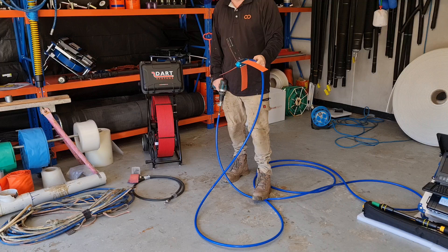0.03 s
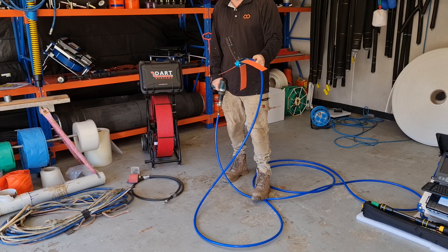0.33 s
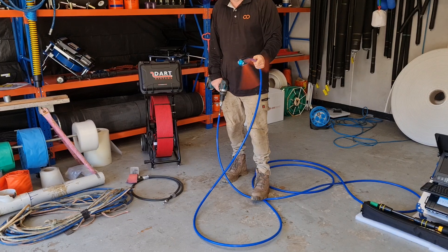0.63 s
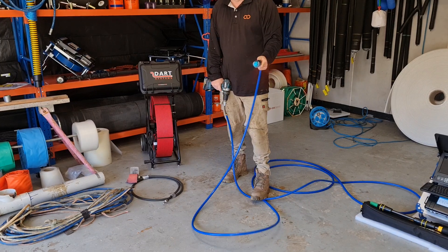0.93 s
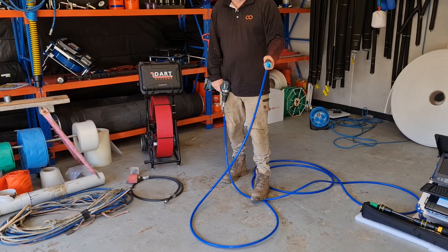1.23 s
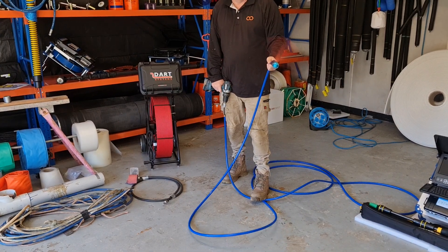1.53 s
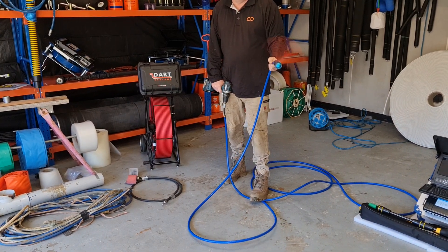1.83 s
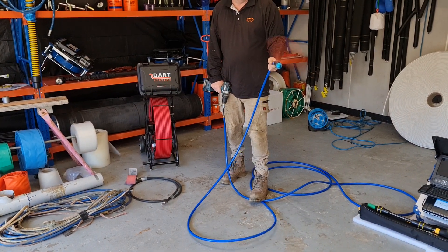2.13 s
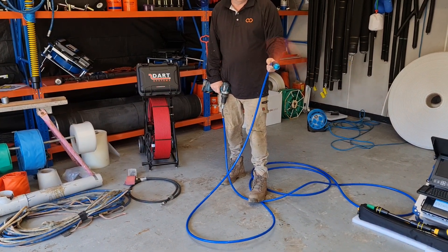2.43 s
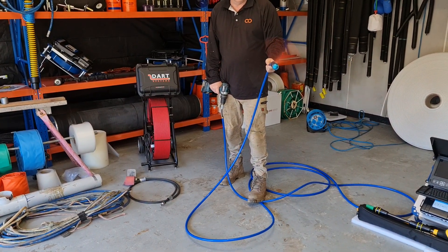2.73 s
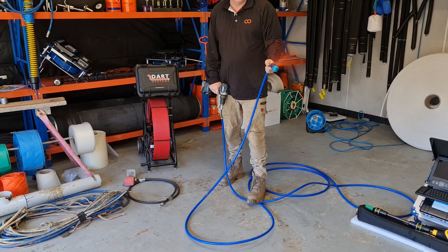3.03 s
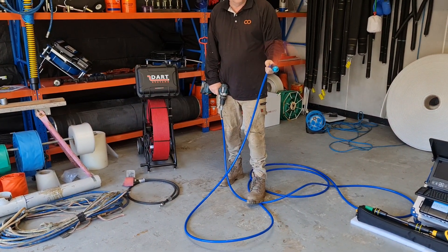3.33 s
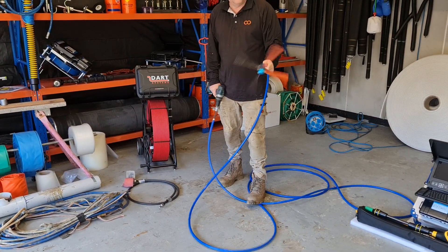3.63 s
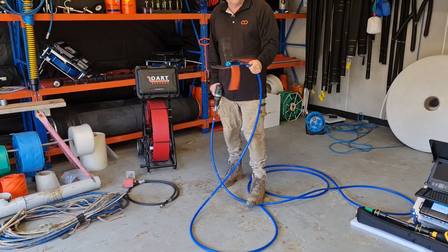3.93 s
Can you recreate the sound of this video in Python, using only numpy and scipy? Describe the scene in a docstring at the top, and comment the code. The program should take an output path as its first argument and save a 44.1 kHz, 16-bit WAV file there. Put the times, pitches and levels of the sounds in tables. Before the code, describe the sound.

A cordless drill creeps with a faint, thin whine from about 0.4 seconds. Near 0.8 it clacks and races up, wavers briefly, then whirs evenly from 1.3 while a flexible shaft rubs and rattles inside its hose. At 3.6 it stops with a sharp, ringing metallic squeak, followed by a light knock. The drill briefly starts again at 3.9. The workshop adds a short echo.

```python
"""In a workshop, a cordless drill turns a long flexible shaft inside its hose.
It first creeps, with the thin whine of its chopped current, then races up and hunts for its speed.
It settles into an even run: motor and gears sound multiples of the rotation rate, and the cable
rattles in the hose. The brake stops it with a sharp friction squeak that sets the chuck ringing.
The tip knocks once, and the trigger is squeezed again."""
import sys
import numpy as np
from scipy import signal
from scipy.fft import rfft, irfft
from scipy.io import wavfile

SR = 44100
rng = np.random.default_rng(int(sys.argv[2]) if len(sys.argv) > 2 else 0)


def unload_wav(signal):
    """Save mono or channel-first audio to the path in sys.argv[1] as 16-bit WAV at rate SR, clipped to [-1, 1]."""
    wavfile.write(
        sys.argv[1],
        SR,
        np.round(np.clip(np.atleast_2d(signal).T, -1, 1) * 32767).astype(np.int16),
    )


N = 176400
WHINE_ROOM_DB = 3   # reverberant over direct sound, for motor, gears and speed control


def drill(speed, shaft_angle):
    """Rotational orders: motor and gears radiate tones at fixed multiples of one fluttering speed."""
    # tones of the motor and of the gears: multiple of the motor speed, relative level/dB
    motor_orders = [(7, -14), (7.745, -21), (8, 7), (8.325, -21), (8.5, -24), (8.75, -14), (9, -22),
                    (16, -17)]
    gear_orders = [(.555, -23.5), (1.817, -14), (2.503, -19), (3, -6.5), (4.245, -13.5), (4.5, -24),
                   (5, -18), (6, 1.5), (6.75, -10), (9.5, -22), (12, -10), (14, -12), (16.5, -18),
                   (17.26, -18), (21, -22)]
    # envelopes of the motor whine and of the gears: t/s, level/dB
    motor_levels = [(.36, -100), (.39, -63), (.72, -76), (.79, -25), (.83, -26.5), (1.0, -29),
                    (1.05, -29.5), (1.1, -23), (1.14, -34.5), (1.22, -29.5), (1.29, -26.5), (1.36, -29.5),
                    (1.49, -28.5), (1.62, -30.5), (1.82, -24), (1.93, -19), (2.0, -27.5), (2.3, -25),
                    (2.39, -28.5), (2.53, -22), (2.63, -30.5), (2.8, -32.5), (2.9, -22.5), (3.0, -30.5),
                    (3.18, -34), (3.36, -26), (3.52, -28.5), (3.58, -39), (3.65, -85)]
    gear_levels = [(.36, -100), (.39, -66), (.72, -69), (.83, -31.5), (1.15, -35), (1.3, -30.5), (1.4, -32),
                   (1.6, -35), (2.05, -34), (2.3, -35.5), (2.45, -32.5), (2.75, -31.5), (2.88, -38),
                   (3.05, -31.5), (3.3, -31.5), (3.52, -28.5), (3.56, -40), (3.65, -85)]
    settled_s, settling_s, stutter_db = 1.34, 0.1127, 2
    hunting = np.clip((settled_s - seconds()) / settling_s, 0, 1)
    flutter = 0.00079 * wobble(hz=11)
    judder = 0.02202 * hunting * wobble(hz=112.4)   # lasts until the shaft settles
    turn_ripple = .0004 * np.sin(shaft_angle)
    motor_angle = 2 * np.pi * np.cumsum(speed * (1 + flutter + judder + turn_ripple)) / SR
    out = 0
    for orders, levels in ((motor_orders, motor_levels), (gear_orders, gear_levels)):
        tones = 0
        for order, db in orders:
            gain = from_db(db + stutter_db * wobble(hz=20.6))   # tones come and go as the shaft whips
            tones += gain * np.sin(order * motor_angle + rng.uniform(0, 2 * np.pi))
        out += workshop(rms_one(tones) * from_db(in_time(levels)[0]), WHINE_ROOM_DB)
    return out


def cable(speed, shaft_angle, loops=5):
    """Friction noise: the cable rubs and ticks in each loop of hose, most at one point of the turn."""
    # envelope of the rubbing: t/s, level/dB
    rub_levels = [(.35, -100), (.385, -46.5), (.55, -45), (.70, -40.5), (.76, -35.5), (.805, -31.5),
                  (.95, -29), (1.2, -31), (1.3, -29), (2.0, -29.5), (2.8, -29.5), (3.52, -29.5),
                  (3.59, -30.5), (3.65, -36), (3.72, -42), (3.80, -69), (3.888, -62), (3.898, -44),
                  (3.94, -32.5), (4, -57)]
    # spectrum of the rubbing: f/Hz, relative spectral level/dB
    rub_spectrum = [(60, -29), (130, -21), (240, -15.5), (480, -7), (780, 1), (1050, -3), (1500, 3.5),
                    (2000, -1.5), (2800, -2), (3500, 3.5), (3950, -4.5), (5000, -6), (7000, -8.5),
                    (7800, -19.5), (11000, -21), (16000, -23.5)]
    ticks_per_s, tick_spread_db, turn_depth, treble_hz = 900, 4.5, 0.63, 7200
    level = from_db(in_time(rub_levels)[0])
    treble = .25 + .75 * speed / speed.max()   # faster sliding is brighter
    out = 0
    for _ in range(loops):
        sizes = from_db(tick_spread_db * np.minimum(rng.exponential(1, N), 5))
        signs = rng.choice([-1, 1], N)
        ticks = rms_one(sizes * signs * (rng.random(N) < ticks_per_s / SR))
        friction = rng.standard_normal(N) / 2 + 0.66 * ticks
        contact = 1 + turn_depth * np.sin(shaft_angle + rng.uniform(0, 2 * np.pi))
        rub = coloured(friction * contact, rub_spectrum)
        dull, hiss = passband(rub, treble_hz), passband(rub, treble_hz, "high")
        rub = dull - treble * hiss   # the two bands are in antiphase, so the minus joins them
        out += workshop(level * rub, room_db=7.5, lag_s=.00038)
    return out / np.sqrt(loops)


def squeaks():
    """Stick-slip friction: metal squeaks at a rough, sagging pitch; the modes of the chuck ring on."""
    # squeaks as the drive catches and locks: t/s, duration/s, f/Hz, level/dB
    slips = [(0.709, .03, 1387, -34.5), (3.599, 0.015, 1515, -14.5)]
    # modes of the chuck: f/Hz, level relative to the squeak/dB, T60/s
    chuck_modes = [(1310, -7.5, .13), (1405, -2, 0.097), (1655, -9, .2), (1725, -7.5, 0.13),
                   (1916, -17, 0.42), (3060, -10.5, 0.19), (3260, -14, 0.15), (4650, -22, 0.17)]
    attack_s, release_s, sag_hz_per_s, jitter_hz = 0.0021, 0.0019, 3000, 45.7
    out = 0
    for start_s, length_s, pitch_hz, level_db in slips:
        age = np.maximum(seconds() - start_s, 0)
        pitch = pitch_hz - sag_hz_per_s * np.minimum(age, length_s) + jitter_hz * wobble(hz=137)
        release = np.exp(-np.maximum(age - length_s, 0) / release_s)
        slip = np.sqrt(2) * release * np.sin(2 * np.pi * np.cumsum(pitch) / SR)
        ring = sum(from_db(db - 60 * age / t60) * np.sin(2 * np.pi * (hz * age + rng.random()))
                   for hz, db, t60 in chuck_modes)
        out += from_db(level_db) * np.minimum(age / attack_s, 1) * (slip + ring)
    return workshop(out, room_db=2.5)


def knocks():
    """Impact noise: slack in the drive, taken up or let go, gives short, exponentially damped bursts."""
    # impacts: t/s, level before band-limiting/dB, attack/s, decay/s, lowest f/Hz, highest f/Hz
    impacts = [(.378, -38, 0.018, 0.017, 400, 9000), (.480, -36, 0.0072, .018, 4500, 10000),
               (0.729, -20, .004, 0.029, 704, 1720), (.731, -40, .004, 0.018, 3000, 12000),
               (.796, -22.5, 0.011, 0.016, 3000, 12600), (3.603, -19.5, .007, 0.019, 1900, 11000),
               (3.726, -35.5, .003, 0.025, 100, 13000), (3.893, -29.5, .004, 0.089, 1300, 1900),
               (3.93, -30, 0.026, 0.04, 2480, 13000)]
    # spectrum common to the impacts: f/Hz, relative spectral level/dB
    impact_spectrum = [(60, 1), (300, -33.5), (1000, 10), (3200, 8), (6500, -0.5), (8500, -4.5),
                       (16000, -5)]
    noise = coloured(rng.standard_normal(N), impact_spectrum)
    out = 0
    for start_s, db, attack_s, decay_s, low_hz, high_hz in impacts:
        age = np.maximum(seconds() - start_s, 0)
        envelope = np.minimum(age / attack_s, 1) * np.exp(-age / decay_s)
        clatter = passband(passband(noise, high_hz), low_hz, "high")
        out += from_db(db) * envelope * clatter
    return workshop(out, room_db=2)


def throttle():
    """Resonance: at part throttle the chopped current sings in narrow bands of noise."""
    # envelope of the speed control's whine: t/s, level/dB
    whine_levels = [(.33, -100), (.38, -48), (.45, -46.5), (.58, -40.5), (.70, -41.5), (.79, -41),
                    (.83, -100), (3.87, -100), (3.91, -47), (4, -46)]
    # its resonances: f/Hz, bandwidth/Hz, relative level/dB
    resonances = [(2650, 160, -11.5), (2847, 230, -1.5), (3660, 43, -18.5), (4850, 64, -16),
                  (7370, 120, -16), (8100, 83, -17)]
    tones = 0
    for hz, width_hz, db in resonances:
        in_phase, quadrature = passband(rng.standard_normal((2, N)), width_hz / 2)
        phase = 2 * np.pi * hz * seconds()
        tones += from_db(db) * rms_one(in_phase * np.cos(phase) + quadrature * np.sin(phase))
    return workshop(rms_one(tones) * from_db(in_time(whine_levels)[0]), WHINE_ROOM_DB)


def hose(shaft_angle):
    """Forced vibration: the unbalanced shaft shakes the hose against the floor."""
    # envelopes of the shaking: t/s, hum level/dB, rumble level/dB
    shake_levels = [(.7, -85, -86), (.89, -66, -58), (.98, -48, -49.5), (1.1, -72, -54), (1.6, -85, -50.5),
                    (2.2, -60.5, -51), (2.8, -59, -49), (3.1, -66, -46.5), (3.45, -63, -45),
                    (3.62, -63, -48), (3.85, -67, -60.5)]
    # spectrum of the rumble: f/Hz, relative spectral level/dB
    rumble_spectrum = [(25, -59), (72, 4), (100, -6), (140, 2.5), (190, -7), (235, 3.5), (290, -2),
                       (370, 3.5), (520, -21), (1500, -32)]
    hum_db, rumble_db = in_time(shake_levels)
    hum = from_db(hum_db) * rms_one(np.sin(shaft_angle))
    rumble = from_db(rumble_db) * coloured(diffuse(N), rumble_spectrum)
    return hum + rumble


def air(level_db=-58.5):
    """Ambient noise: the still air of the workshop is a faint, steady, diffuse field."""
    # spectrum of the air: f/Hz, relative spectral level/dB
    air_spectrum = [(25, -35), (55, 1), (75, 0.5), (95, -7), (200, -10.5), (460, -13.5), (1100, -21.5),
                    (2800, -25.5), (6000, -26.5), (9000, -37), (15000, -54)]
    return from_db(level_db) * coloured(diffuse(N), air_spectrum)


def workshop(x, room_db, lag_s=0):
    """Reverberation: echoes follow the direct sound, which reaches the left ear lag_s after the right."""
    bass_t60_s, treble_t60_s, early_t60_s = 0.46, 0.33, 0.12
    early_db, gap_s = 6, .005
    t = np.arange(int(.7 * SR)) / SR
    noise = diffuse(len(t))
    bass = passband(noise, hz=1300, order=1)
    tail = bass * from_db(-60 * t / bass_t60_s) + (noise - bass) * from_db(-60 * t / treble_t60_s)
    early = diffuse(len(t)) * from_db(early_db - 60 * t / early_t60_s)   # near walls and shelves
    response = rms_one((tail + early) * (t > gap_s)) / np.sqrt(len(t))
    wet = signal.fftconvolve(x[None], response, axes=1)[:, :N]
    direct = np.array([np.pad(x, (round(lag_s * SR), 0))[:N], x])
    return (direct + from_db(room_db) * wet) / np.hypot(1, from_db(room_db))


def diffuse(size, wide_above_hz=415, bass_width=0.18):
    """Diffuse field: noise from all around is alike at both ears in the bass, unrelated in the treble."""
    mid, side = rng.standard_normal((2, size))
    side = passband(side, wide_above_hz, "high") + bass_width * side
    return np.array([mid + side, mid - side])


def coloured(x, spectrum):
    """Spectral shaping: weight x by rows of f/Hz, level/dB, then scale to unit power."""
    hz, db = np.transpose(spectrum)
    bin_hz = np.maximum(np.fft.rfftfreq(N, 1 / SR), 1)
    gain = from_db(np.interp(np.log(bin_hz), np.log(hz), db)) * (bin_hz > 18)
    return rms_one(irfft(rfft(x) * gain, N))


def wobble(hz):
    """Random modulation: low-passed noise of unit power."""
    return rms_one(passband(rng.standard_normal(N), hz))


def passband(x, hz, kind="low", order=2):
    """Maximally flat low- or high-pass filtering."""
    return signal.sosfilt(signal.butter(order, np.clip(hz, 1, .45 * SR), kind, fs=SR, output="sos"), x)


def in_time(rows):
    """Linear interpolation: one curve for each column after t/s."""
    times, *columns = np.transpose(rows)
    return [np.interp(seconds(), times, column) for column in columns]


def seconds():
    """Uniform sampling: t/s of every sample."""
    return np.arange(N) / SR


def from_db(db):
    """Decibel law: level to amplitude ratio."""
    return 10 ** (np.asarray(db) / 20)


def rms_one(x):
    """Normalisation to unit power."""
    return x / np.sqrt(np.mean(x ** 2) + 1e-20)


def scene():
    """Superposition: the sources add, and one speed drives the motor, the cable and the hose."""
    # rotation rate of the motor: t/s, f/Hz
    motor_speed = [(.37, 50), (.70, 110), (.76, 310), (.80, 385), (.83, 452), (.855, 440), (.88, 395),
                   (.91, 378), (.96, 408), (1.01, 421), (1.045, 392), (1.075, 388), (1.10, 430),
                   (1.125, 436), (1.18, 418), (1.22, 385), (1.25, 440), (1.285, 452), (1.32, 424),
                   (1.37, 410), (1.45, 419.5), (1.55, 420), (1.9, 415.3), (2.05, 418.4), (2.3, 419),
                   (2.55, 415.6), (2.75, 413.6), (3.05, 418.6), (3.25, 417.7), (3.52, 410.6), (3.59, 395),
                   (3.63, 50), (3.88, 50), (3.95, 260)]
    gear_ratio = 11.1   # motor turns per shaft turn
    speed, = in_time(motor_speed)
    shaft_angle = 2 * np.pi * np.cumsum(speed / gear_ratio) / SR
    return (air() + drill(speed, shaft_angle) + cable(speed, shaft_angle)
            + throttle() + hose(shaft_angle) + squeaks() + knocks())


def record(dry):
    """Panning and band-limiting: after a brief silence, the top treble leans right; the very top is cut."""
    pan_db, start_s, cutoff_hz = 2.5, .091, 15900
    top = dry - passband(dry, hz=11600, order=1)
    ear_gains = from_db([[-pan_db], [pan_db]])
    tilted = dry + top * (ear_gains - 1)
    steep_lowpass = signal.ellip(12, .1, 90, cutoff_hz, fs=SR, output="sos")
    return signal.sosfilt(steep_lowpass, tilted * (seconds() > start_s))


dry = scene()
out = record(dry)
unload_wav(out)
```